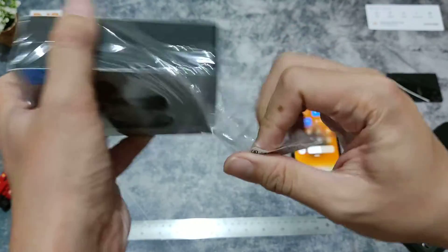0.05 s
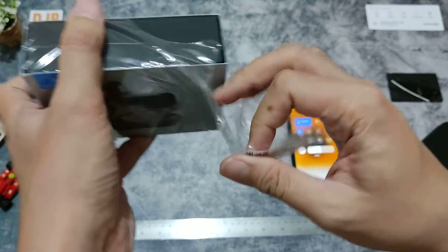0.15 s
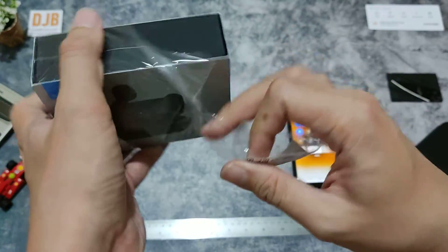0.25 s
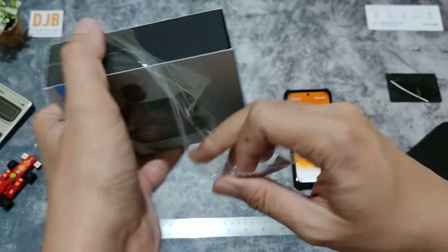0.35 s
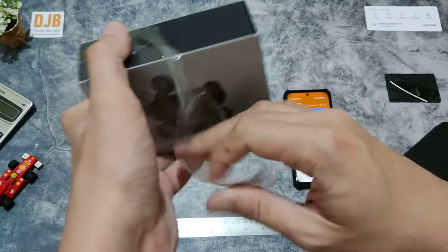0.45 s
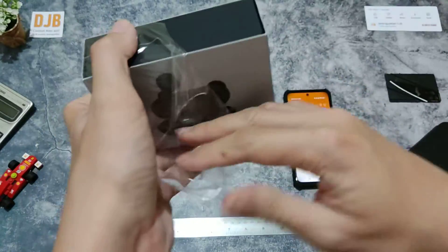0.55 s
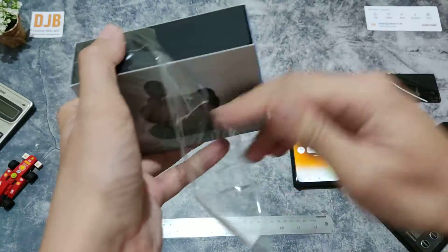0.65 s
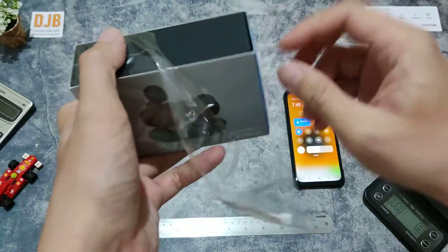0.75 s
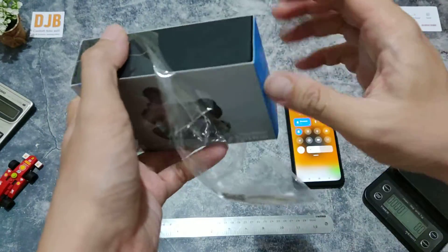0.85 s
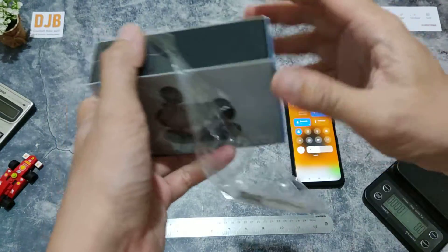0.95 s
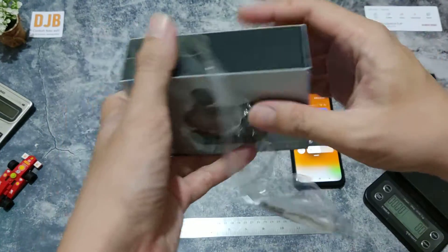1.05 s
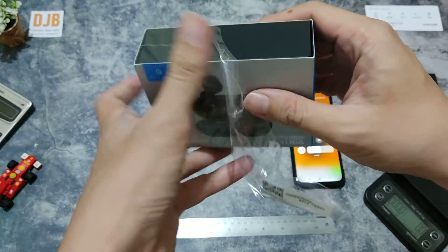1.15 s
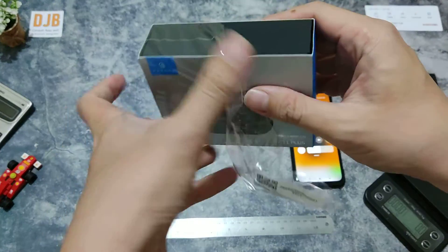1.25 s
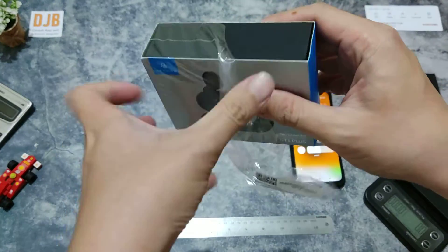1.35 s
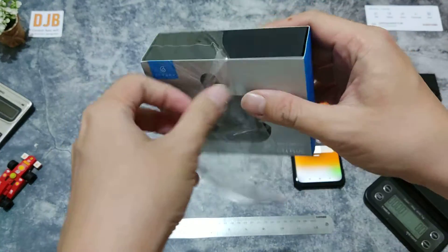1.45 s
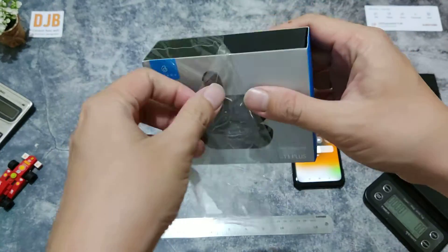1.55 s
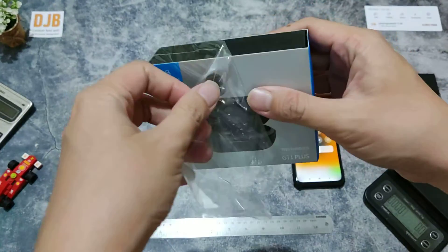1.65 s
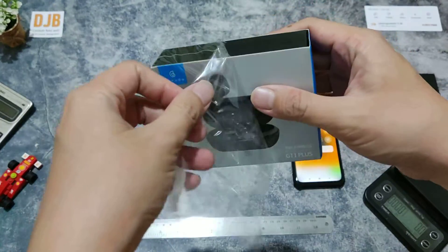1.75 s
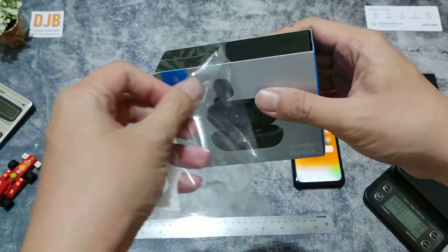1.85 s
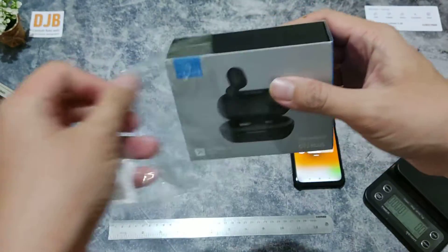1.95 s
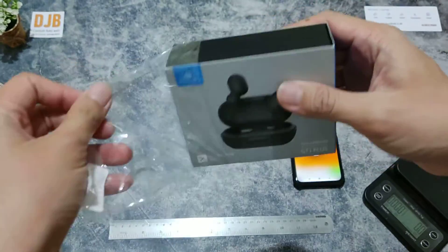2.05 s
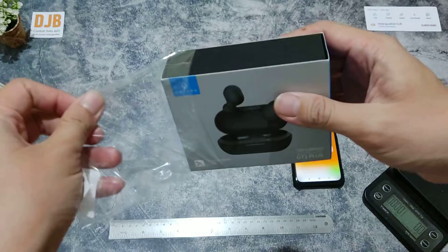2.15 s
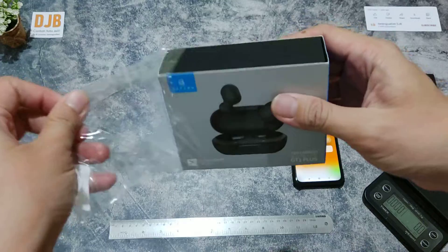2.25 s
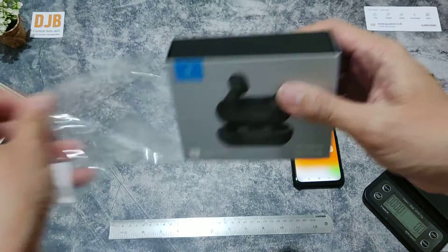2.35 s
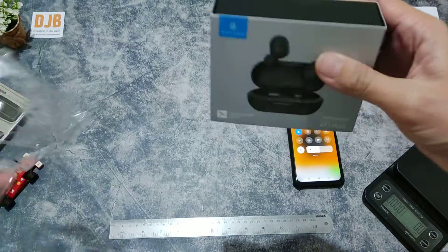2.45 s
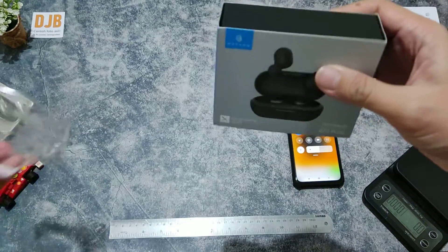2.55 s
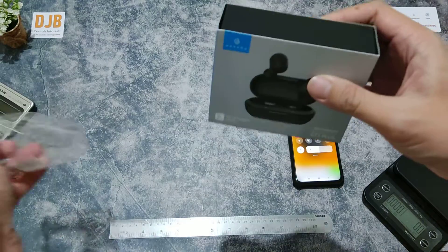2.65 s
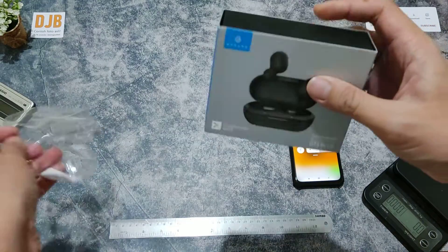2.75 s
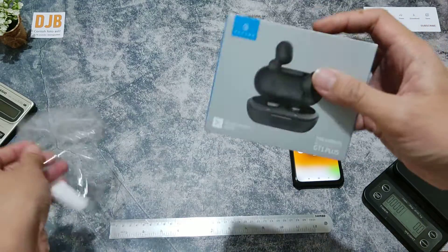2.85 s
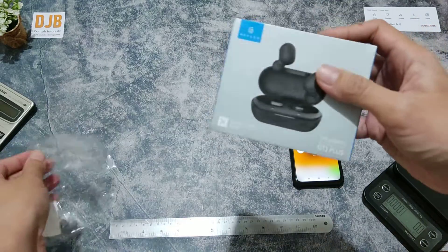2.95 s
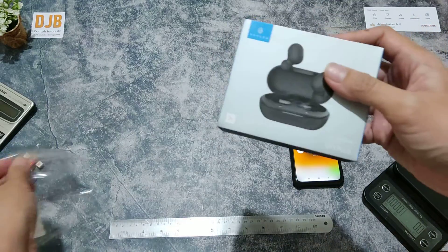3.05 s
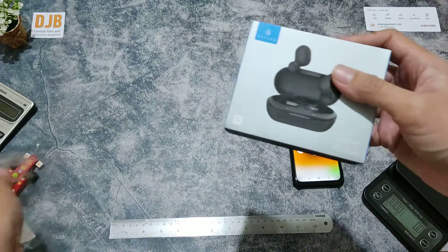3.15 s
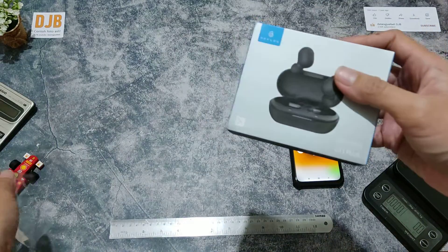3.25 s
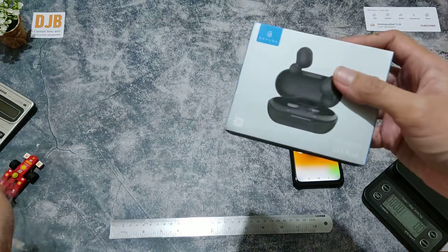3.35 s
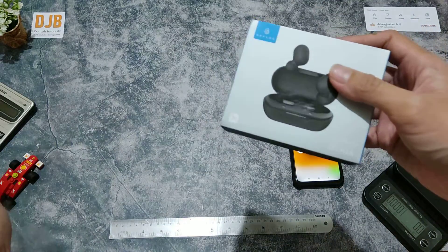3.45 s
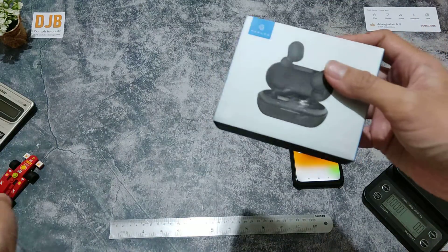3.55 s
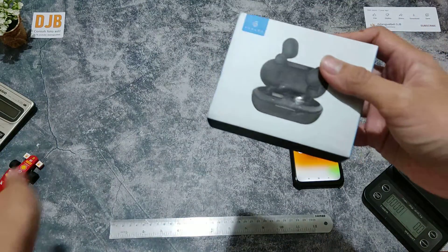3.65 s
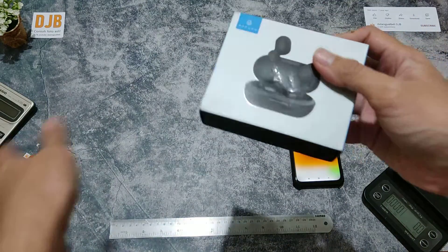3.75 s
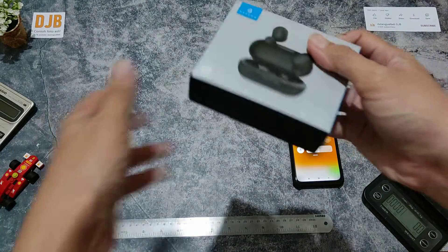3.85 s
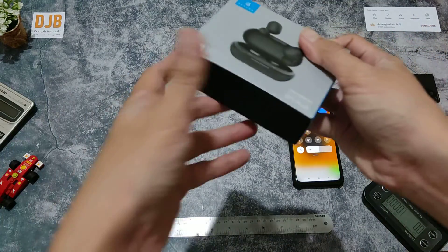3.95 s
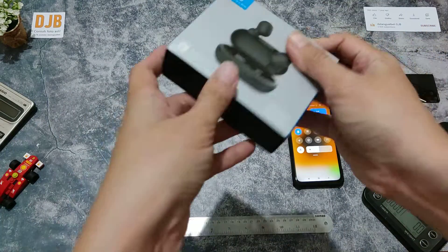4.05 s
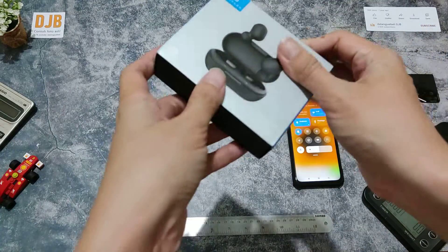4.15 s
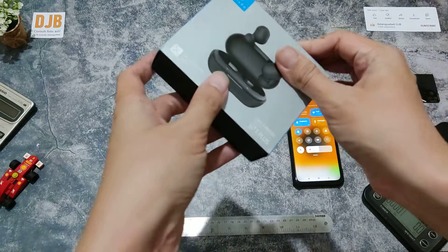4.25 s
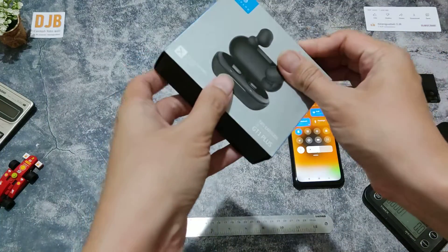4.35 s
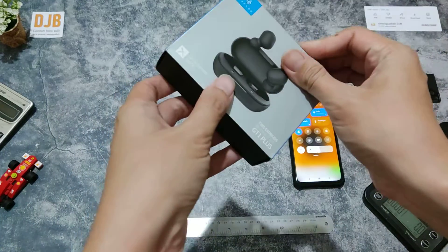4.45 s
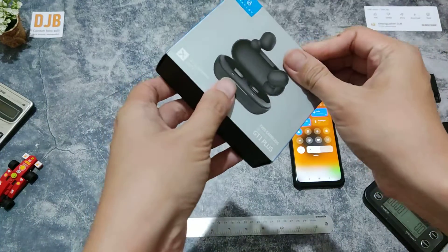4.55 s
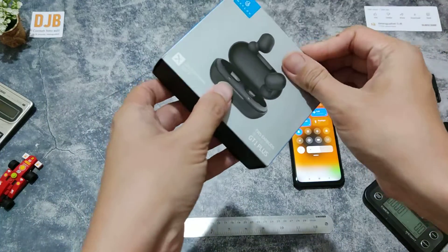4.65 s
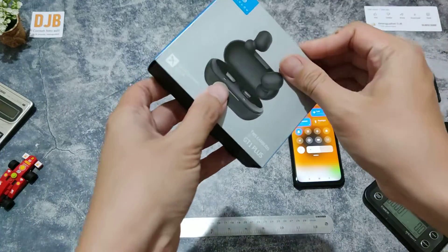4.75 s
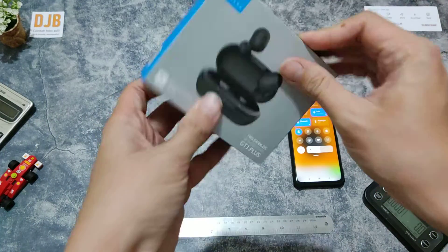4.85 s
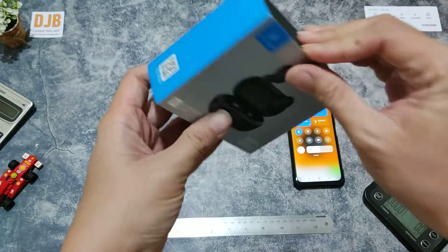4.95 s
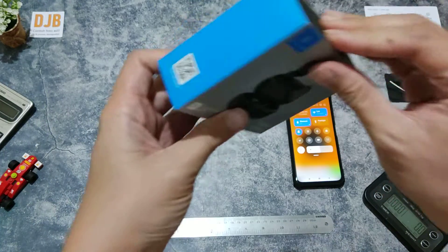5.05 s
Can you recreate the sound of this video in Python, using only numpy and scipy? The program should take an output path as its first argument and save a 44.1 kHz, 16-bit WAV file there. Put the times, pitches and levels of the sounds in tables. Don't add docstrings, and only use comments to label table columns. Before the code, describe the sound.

Very close to a phone microphone in a quiet room, thin plastic wrap crackles densely, with sharp bright snaps and short rips. A strip tears first, a calmer gap follows, then the sleeve is pulled off with the loudest snaps. Loose film settles in small ticks, one late crack sounds, and only soft skin rubs and faint hollow knocks on card remain.

```python
import sys
import numpy as np
from scipy import signal
from scipy.fft import rfft, irfft, next_fast_len
from scipy.io import wavfile
from scipy.ndimage import uniform_filter1d, map_coordinates

SR = 44100
rng = np.random.default_rng(int(sys.argv[2]) if len(sys.argv) > 2 else 0)


def ratio(d):
    e = np.asarray(d, float) / 20
    return 10 ** e


def store_pcm(level_fs):
    pcm = np.round(np.clip(level_fs, -1, 1) * 32767).astype(np.int16)
    wavfile.write(sys.argv[1], SR, np.atleast_2d(pcm).T)


N = 225527
EDGE_HZ = 14300


def unit(x):
    return x / np.sqrt(np.mean(x ** 2) + 1e-20)


def along(points, hz):
    f, v = np.transpose(points)
    return np.interp(np.log(hz + 1), np.log(f + 1), v)


def filtered(x, response):
    m = next_fast_len(x.shape[-1] + 8192)
    spectrum = rfft(x, m) * response(np.fft.rfftfreq(m, 1 / SR))
    return irfft(spectrum, m)[..., :x.shape[-1]]


def resonances(modes):
    def response(f):
        total = 0
        for k, (hz, width, db) in enumerate(modes):
            total = total + (-1) ** k * ratio(db) * 1j * f * width / (hz * hz - f * f + 1j * f * width)
        return total
    return response


def sides(pan_db):
    return ratio(np.multiply.outer([.5, -.5], pan_db))


# (pitch [Hz], width [Hz], level [dB])
MIC_PORTS = [
    [(10980, 1510, -6.5), (7000, 4800, -19.5)],
    [(9000, 1110, -3), (10900, 1500, -22)],
]
# (frequency [Hz], level [dB])
FILM_COLOUR = [(800, -22.5), (2000, -44), (4000, 2), (6500, -1.5), (8500, -0.5), (13000, 0), (14500, -1),
               (16500, -31)]


def ports(x):
    def heard(one, port):
        return filtered(one, lambda f: ratio(along(FILM_COLOUR, f)) * resonances(port)(f))
    return np.array([heard(one, port) for one, port in zip(x, MIC_PORTS)])


def grains(per_s, spread_db):
    draw = rng.random((20000, 5))[:int(per_s * N / SR)]
    clumps = map_coordinates(rng.standard_normal(1100), [draw[:, 0] * 1000])
    size = ratio(-spread_db * np.log(1.03 - draw[:, 1]) + 3 * np.tanh(clumps))
    click = size * np.sign(draw[:, 4] - .5)
    at = draw[:, :1] * (N - 30) + 24 * draw[:, 2:4]
    return np.array([np.bincount(at[:, c].astype(int), click, N) for c in (0, 1)])


def patches(depth_db):
    z = signal.stft(rng.standard_normal((2, N)), nperseg=256)[2]
    field = uniform_filter1d(rng.standard_normal(z.shape[1:]), size=5, axis=0)
    field = uniform_filter1d(field, size=8, axis=1)
    return unit(signal.istft(z * ratio(depth_db * unit(field)), nperseg=256)[1][:, :N])


def motion(rows, t, rounding):
    s, db, swell_ms, fade_ms, body_db = np.transpose(rows)[:, :, None]
    late_ms = 1000 * (t - s)
    loss_db = -20 * np.maximum(-late_ms / swell_ms, late_ms / fade_ms) ** rounding
    treble = ratio(db + loss_db) ** 2
    body = ratio(db + body_db + 0.93 * loss_db) ** 2
    return treble.sum(0), body.sum(0)


# (peak time [s], crackle level [dB], swell [ms per 20 dB], fade [ms per 20 dB],
# soft body over the crackle [dB])
FILM_PULLS = [(0.0, -38, 100, 195, -14.5), (.105, -25.5, 35.5, 131, -19), (.16, -31, 60.5, 211, -18),
              (.37, -35, 146, 157, -16.5), (.45, -33.5, 41, 102, -15.5), (.539, -33, 110, 179, -18.5),
              (.7, -42.5, 202, 257, -15.5), (.912, -51.5, 7, 124, -12.5), (.985, -49.5, 44, 248, -26),
              (1.16, -39, 18, 109, -22.5), (1.195, -42, 60, 132, -17), (1.42, -54, 26, 100, -27),
              (1.505, -41.5, 44, 42, -18), (1.595, -39.5, 99, 82, -16.5), (1.705, -37.5, 11, 399, -20.5),
              (1.888, -32, 14, 142, -40), (2.084, -30.5, 118, 167, -15.5), (2.275, -34.5, 48, 136, -18.5),
              (2.434, -26.5, 117, 118, -18), (2.64, -41.5, 46, 100, -16.5), (2.7, -36.5, 60, 138, -23),
              (2.984, -56, 200, 110, -14), (3.078, -56.5, 109, 158, -16), (3.486, -54.5, 206, 229, -10)]
# (peak time [s], hiss level [dB], swell [ms per 20 dB], fade [ms per 20 dB],
# soft body over the hiss [dB])
SKIN_STROKES = [
    (3.755, -46.5, 37, 296, -20),
    (3.97, -45, 46, 65, -13),
    (4.13, -45.5, 134, 165, -15.5),
    (4.309, -57, 30, 66, -8),
    (4.47, -57.5, 202, 303, -5),
    (4.67, -46.5, 45, 96, -12),
    (4.9, -53, 22, 203, -7.5),
    (5.012, -33.5, 28, 93, -20),
    (5.055, -35, 80, 63, -14),
]
# (frequency [Hz], level [dB])
BODY_COLOUR = [(200, -1.5), (500, -6), (1100, -2.5), (1600, -7), (2400, -5), (3500, -5.5), (5500, -7.5),
               (7500, -15.5)]
# (time [s], left-right difference [dB])
HAND_PLACE = [(0, 7.5), (.3, 1.5), (.9, 3.5), (1.8, 1.5), (2.9, 1), (3.55, 1), (4.2, 2.5), (5.11, 3)]


def rustle():
    t = np.arange(N) / SR
    coarse = t[::64]
    pull, pull_body = motion(FILM_PULLS, coarse, rounding=1.15)
    stroke, stroke_body = motion(SKIN_STROKES, coarse, rounding=1.6)
    rest_db, rest_body_db = -66, -76
    db = np.interp(t, coarse, 10 * np.log10(pull + stroke + ratio(rest_db) ** 2))
    body_db = np.interp(t, coarse, 10 * np.log10(pull_body + stroke_body + ratio(rest_body_db) ** 2))

    clicks = unit(grains(per_s=3600, spread_db=1.4))
    film = np.interp(t, [3.7, 3.8], [1, .15])
    share = film * np.clip(0.25 + 0.029 * (db + 72), .05, .9)
    push = np.sqrt(share) * clicks + np.sqrt(1 - share) * patches(depth_db=3.5)
    rub = 0.41 * push + patches(depth_db=3.5)
    body = unit(filtered(rub, lambda f: ratio(along(BODY_COLOUR, f))))

    pan = sides(np.interp(t, *np.transpose(HAND_PLACE)))
    sound = ratio(db - 1.5) * pan * unit(ports(push)) + ratio(body_db + 0.5) * body
    return filtered(sound, lambda f: f < EDGE_HZ)


# (frequency [Hz], level per Hz [dB])
AIR_COLOUR = [(14, -26.5), (24, 5.5), (48, -13), (130, -10.5), (166, -13.5), (241, -14.5), (342, -22.5),
              (412, -21.5), (447, -24.5), (744, -28.5), (1420, -34), (3920, -35.5), (5130, -39),
              (9250, -42), (14600, -61)]
# (frequency [Hz], likeness from -1 to 1)
AIR_ALIKE = [(60, 0.47), (130, 0.69), (290, 0.86), (640, 0.14), (1410, 0.043), (3100, -0.15), (6820, 0.19),
             (15000, -0.03)]
# (pitch [Hz], level [dB])
HUM_TONES = [(727, -80), (56.4, -69)]


def air():
    def mid_side(hz):
        turn = np.arccos(np.clip(along(AIR_ALIKE, hz), -1, 1)) / 2
        return (hz < EDGE_HZ) * ratio(along(AIR_COLOUR, hz)) * [np.cos(turn), np.sin(turn)]
    mid, side = filtered(rng.standard_normal((2, N)), mid_side)
    t = np.arange(N) / SR
    drift = np.cumsum(rng.standard_normal(N)) * 0.0081
    fan = sum(ratio(db + 3.0) * np.sin(2 * np.pi * hz * t + drift) for hz, db in HUM_TONES)
    return ratio(-55) * unit(np.array([mid + side, mid - side])) + fan


# (time
# [s], peak level [dB], left-right difference [dB], dull part [dB])
FILM_BUCKLES = [(0.0351, -21, -4, -23.5), (0.051, -27, 1, -23), (0.09, -4.5, 5.5, -30),
                (0.281, -24, -5, -21.5), (0.3423, -22, 0, -22.5), (0.347, -21, -7, -29),
                (0.403, -26, 0, -20), (0.43, -33.5, 0, -17), (0.443, -18.5, -1, -23),
                (0.4477, -21, 6, -24), (0.4552, -24, 5, -19), (0.486, -20, -9, -22),
                (0.4945, -19.5, 1, -26), (0.5196, -15.5, -5.5, -23.5), (0.543, -20, 2, -30),
                (0.5556, -15.5, -2, -26), (0.586, -23.5, -7, -16), (0.6254, -24.5, -3, -22),
                (0.647, -33, -8, -19.5), (0.664, -36, -8, -18), (0.6998, -28.5, -8, -22),
                (0.74, -34.5, -11, -26), (0.755, -29.5, 6, -22), (0.7894, -11, -2, -33.5),
                (0.806, -36, 6, -15.5), (0.9055, -26.5, 9.5, -21.5), (0.9692, -28, 4, -23),
                (1.1306, -40, 2, -31), (1.1434, -35, 0.5, -33), (1.2157, -26, 5, -32),
                (1.2343, -34, 10, -20.5),
                (1.4032, -51, -10, -24), (1.4219, -31.5, -10, -34), (1.481, -34, 2, -31),
                   (1.541, -36, 7, -19), (1.5638, -31, 8, -36), (1.595, -25, 4, -33),
                   (1.6072, -27.5, -3, -20), (1.6957, -11.5, -1.5, -31.5), (1.715, -12, 0, -36),
                   (1.731, -21, 13, -18.5), (1.7523, -22.5, 1, -20), (1.7618, -26, -1, -24),
                   (1.7927, -9.5, -1, -29), (1.803, -20, 6, -28), (1.8618, -5, 4, -32),
                   (1.8825, -7, 4, -28.5), (2.0108, -39, -0.5, -17), (2.041, -20, 1, -24.5),
                   (2.0533, -21, 9, -31), (2.0617, -18.5, 3, -20), (2.078, -18, 2, -33),
                   (2.0861, -14, -5, -26), (2.158, -26, 1, -27), (2.1786, -25, 2, -22.5),
                   (2.2228, -15, -2, -31.5), (2.2686, -10.5, -8, -34.5), (2.323, -26.5, 2, -22.5),
                   (2.399, -28, -9, -32), (2.4045, -12.5, 0, -30), (2.444, -29, -1.5, -18),
                (2.549, -27, 7, -27), (2.604, -49, 15, -13), (2.619, -36, -10, -18),
                    (2.6308, -26.5, 6, -20), (2.646, -39, 14, -20), (2.663, -21, -4, -21.5),
                    (2.671, -24, -4, -22), (2.6973, -32.5, -9, -19.5), (2.709, -27, 5, -26),
                    (2.7307, -41, -6, -26), (2.733, -36.5, 0, -19), (2.9706, -41, -15, -20),
                    (3.0484, -48, -3.0, -17), (3.067, -38.5, -5, -24), (3.085, -39.5, -1, -19),
                    (3.429, -46.5, -6, -24), (3.4686, -37.5, -4, -24), (3.496, -48, -0.5, -13.5),
                    (3.6532, -43, -4, -21), (4.0598, -40, 11, -20), (4.6307, -46, -1, -17.5),
                (0.0928, -20, 12, -25), (0.0988, -38, 2, -30.5), (.1215, -29, 2, -31),
               (0.1591, -16.5, 7, -21), (0.278, -35.5, -3, -16), (0.49, -22, -3, -21), (.5235, -33, 0, -27),
               (.5465, -27, 0, -21), (.667, -38, 0, -25), (0.693, -36, 0, -14), (0.7322, -39, -6, -25),
               (1.5027, -30, 5, -28), (1.7008, -32, -3, -24), (1.7205, -26, 0, -26),
               (1.7915, -23.5, -2, -23.5), (1.7953, -37, 1, -36), (1.807, -24, -5, -26),
               (1.8653, -16.5, 8, -26), (1.869, -27, 1, -24), (1.8718, -29, 0, -24), (1.983, -45, -4, -30),
               (2.266, -28, -2, -27), (2.277, -35, 2, -25), (2.292, -29, -1, -21), (2.396, -27, 0, -29),
               (2.416, -29, 3, -34), (2.432, -16, -11, -34), (2.4348, -11, -7, -22.5),
               (2.637, -39.5, -5, -14.5), (2.659, -36, -4, -20), (2.695, -34, 0, -18), (2.751, -40, 0, -23),
               (5.003, -32, 5, -22)]
# (time [s], peak level [dB], left-right difference [dB], dull part [dB], length [ms])
LONG_RIPS = [
    (0.0687, -18, -4, -16.5, 2.9),
    (.107, -8.5, 13, -20, 4.6),
    (0.528, -15, -11, -30, 5.3),
    (2.2552, -20.5, 0, -10.5, 5.3),
    (2.4272, -9, -3, -14, 8.2),
    (2.431, -12.5, -8, -13, 8.8),
    (3.692, -7, 13.5, -36, 1.3),
    (3.745, -26.5, -2, -21.5, 8.7),
    (4.88, -38, 10.5, -11, 11),
    (4.9927, -32, 13, -15, 2.5),
]
# (frequency [Hz], level [dB])
TAUT_COLOUR = [(2000, -54.5), (4500, -33), (6500, 0), (8500, 0), (12500, 0), (14500, 0), (16500, -22)]
# (pitch [Hz], width [Hz], level [dB])
SLACK_MODES = [(7000, 3100, 6), (3490, 3400, -1), (1130, 540, -5.5)]


def snaps():
    sharp, dull = np.zeros((2, N + 600)), np.zeros((2, N + 600))
    t = np.arange(600) / SR
    pop_hz, pop_s, crack_rise_s = 10030, 0.00013, 0.00022
    pop = np.exp(-.5 * ((t - .0004) / pop_s) ** 2) * np.cos(2 * np.pi * pop_hz * t)

    def taut(f):
        return ratio(along(TAUT_COLOUR, f))

    buckles = list(LONG_RIPS)
    for s, db, pan_db, dull_db in FILM_BUCKLES:
        ms = 5.86 + 0.15 * dull_db
        buckles.append((s, db + 5.5, pan_db, dull_db + 4.0, ms))
    for s, db, pan_db, dull_db, ms in buckles:
        fade_s = np.clip(ms - .5, .7, 9) * 0.00058
        cracks = rng.standard_normal((2, 600)) * rng.standard_normal((2, 600))
        cracks *= (1 - np.exp(-t / crack_rise_s)) * np.exp(-t / fade_s)
        cracks += ratio(np.clip(-60.5 - 1.86 * dull_db, -40, 15)) * pop
        cracks /= np.abs(ports(filtered(cracks, taut))).max(1, keepdims=True)
        start = round(s * SR)
        sharp[:, start:][:, :600] += ratio(db - 2.5) * sides(pan_db)[:, None] * cracks
        dull[:, start:][:, :600] += ratio(db + dull_db - 7.5) * cracks
    slack = filtered(dull[:, :N], lambda f: (f < EDGE_HZ) * resonances(SLACK_MODES)(f))
    return ports(filtered(sharp[:, :N], taut)) + slack


# (time [s], peak level [dB], pitch [Hz], hollow part [dB])
BOX_KNOCKS = [(0.068, -33.5, 1230, -19), (0.098, -35.5, 437, -16), (0.275, -43.5, 970, -19),
              (0.439, -44, 1000, 6), (0.806, -37, 470, -10), (0.904, -38.5, 890, -9),
              (1.156, -37.5, 370, -23), (1.2045, -36, 400, -16), (1.2145, -35, 795, -25),
              (1.7155, -42, 1120, -7), (1.803, -47, 1230, -5), (2.084, -32.5, 1256, -8),
              (2.139, -37, 1230, 2), (2.27, -28.5, 283, -38), (2.427, -21.5, 1070, 3),
              (2.862, -49, 339, -17), (2.988, -44, 346, -8), (3.976, -61, 350, 9), (4.048, -43.5, 410, 1),
              (4.631, -52, 307, -13), (4.879, -46.5, 1285, -11)]
# (pitch [Hz], width [Hz], level [dB])
CARD_MODES = [(1074, 350, -2), (437, 92, 2), (152, 280, -5.5)]
# (pitch [Hz], width [Hz], level [dB])
HOLLOW_MODES = [(346, 11, 4), (207, 220, -5)]


def knocks():
    ring, scuff, blows = np.zeros(N + 4000), np.zeros((3, N + 4000)), np.zeros(N)
    t = np.arange(4000) / SR
    rise = 1 - np.exp(-t / 0.002)
    ring_t60_s, scuff_t60_s = 0.02, 0.039
    for s, db, hz, hollow_db in BOX_KNOCKS:
        start = round(s * SR)
        noise = rng.standard_normal((3, 4000))
        ring[start:][:4000] += ratio(db + 2 - 60 * t / ring_t60_s) * rise * np.sin(2 * np.pi * hz * t)
        scuff[:, start:][:, :4000] += ratio(db + 6.0 - 60 * t / scuff_t60_s) * rise * noise
        blows[start] = ratio(db + hollow_db + 32.5)
    apart = filtered(scuff[1:, :N], lambda f: f / (f + 400))
    wall = filtered(scuff[0, :N] + 1.67 * apart, resonances(CARD_MODES))
    return ring[:N] + wall + filtered(blows, resonances(HOLLOW_MODES))


# (time [s], peak level [dB], centre pitch [Hz], length [ms])
CARD_SLAPS = [(0.0911, -31, 1240, 2.2), (0.097, -33.5, 2300, 2.4), (0.1095, -34, 1480, 2),
              (.2795, -43, 1090, 2), (.4435, -45, 1000, 2), (0.455, -41, 1210, 3), (.531, -42, 2200, 3.3),
              (1.7148, -37.5, 1120, 2.2), (1.7225, -53, 1100, 2.6), (1.7341, -44.5, 1090, 3.4),
              (1.7525, -51, 1600, 1.7), (1.762, -46, 1200, 3), (1.8045, -41, 1470, 2),
              (1.864, -38, 1560, 2.3), (1.883, -45, 1200, 1.7), (2.2552, -24, 3500, 3.2),
              (2.2695, -39, 1400, 3.6), (2.369, -46, 1080, 2.2), (2.401, -37, 1180, 3.1),
              (2.636, -42, 3000, 2.6), (3.98, -50, 2660, 18), (4.305, -50, 2500, 8.3),
              (3.26, -62, 2500, 79), (4.36, -61.5, 2480, 120), (4.48, -64, 2380, 85), (.807, -41, 795, 3.6),
              (3.975, -52, 400, 5.6), (4.962, -53, 1200, 1.6), (4.987, -48, 1010, 3.3),
              (5.048, -40.5, 1900, 4), (5.059, -39, 2180, 4)]


def slaps():
    out = np.zeros((2, N + 9000))
    t = np.arange(9000) / SR
    for s, db, hz, ms in CARD_SLAPS:
        u = t / (ms * 0.00038)
        noise = rng.standard_normal((3, 9000))
        puff = (noise[0] + 1.1 * noise[1:]) * u * np.exp(-u)
        puff = filtered(puff, lambda f: resonances([(hz, hz / 1.55, 0)])(f) ** 2)
        out[:, round(s * SR):][:, :9000] += ratio(db) * puff / np.abs(puff).max()
    return out[:, :N]


# (time [s], level [dB])
TABLE_ECHOES = [(.0009, -17.5), (.003, -37), (.0044, -25.5), (.0065, -52), (.009, -47)]
# (frequency [Hz], time to fall 60 dB [s])
WALL_DECAY = [(300, 0.42), (3000, 0.99), (12000, 0.079)]


def room(x):
    early = sum(ratio(db) * np.pad(x, ((0, 0), (round(s * SR), 0)))[:, :N] for s, db in TABLE_ECHOES)
    hz, t, z = signal.stft(rng.standard_normal((2, SR // 3)), SR, nperseg=256)
    fade = ratio(-60 * t / along(WALL_DECAY, hz)[:, None])
    tail = signal.istft(z * fade, SR, nperseg=256)[1]
    tail = tail / np.linalg.norm(tail[0])
    return early + ratio(-23) * signal.fftconvolve(x, tail, axes=1)[:, :N]


def scene():
    bed = rustle() + air()
    buckles = snaps()
    blows = knocks() + slaps()
    soft = filtered(blows + room(buckles + blows), lambda f: f < EDGE_HZ)
    return buckles + soft + bed


def band_limit(x):
    return signal.sosfilt(signal.butter(12, 16650, fs=SR, output="sos"), x)


# (time [s], level [dB])
PHONE_GAIN = [(1.886, -1), (1.9, -3), (1.968, -7.5), (1.982, -0.5)]


def record(dry):
    gain = ratio(np.interp(np.arange(N) / SR, *np.transpose(PHONE_GAIN)))
    mix = np.clip(dry * gain, -.88, .88)
    return band_limit(mix)


dry = scene()
out = record(dry)
store_pcm(out)
```